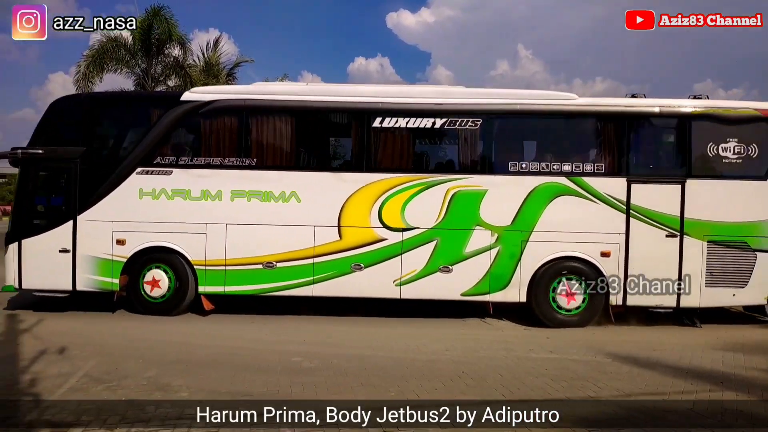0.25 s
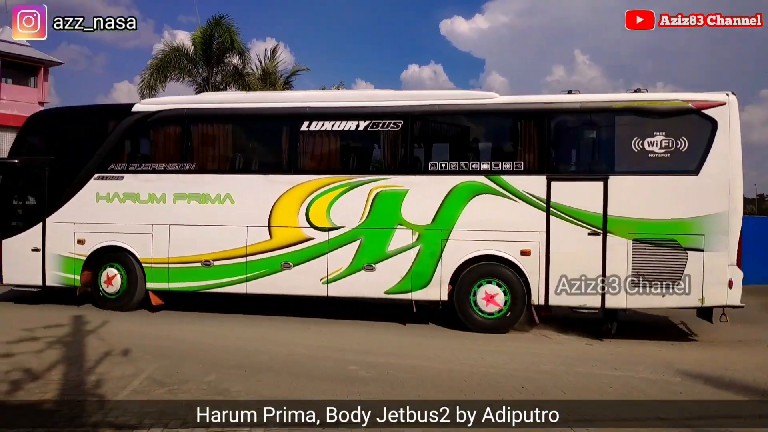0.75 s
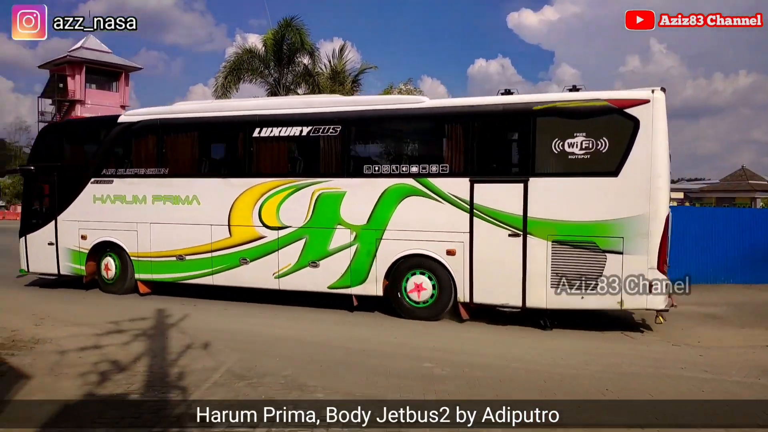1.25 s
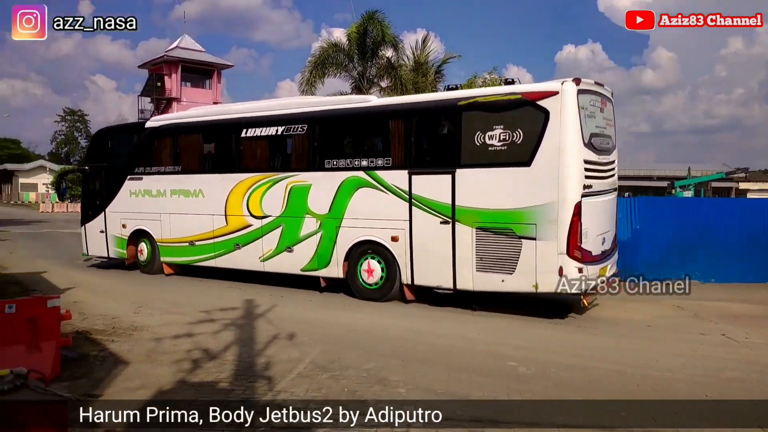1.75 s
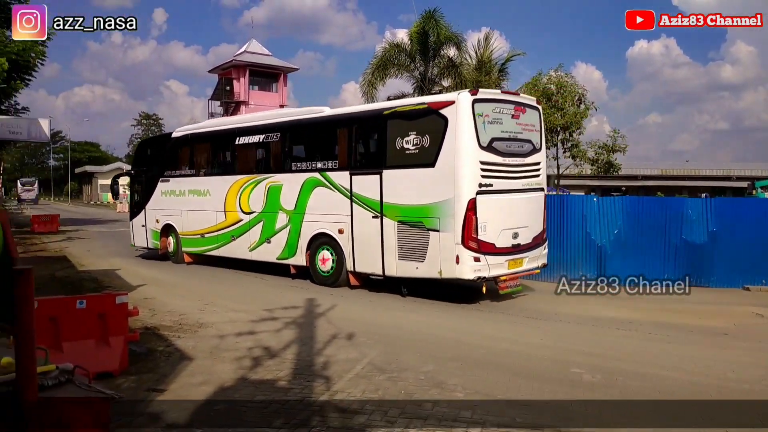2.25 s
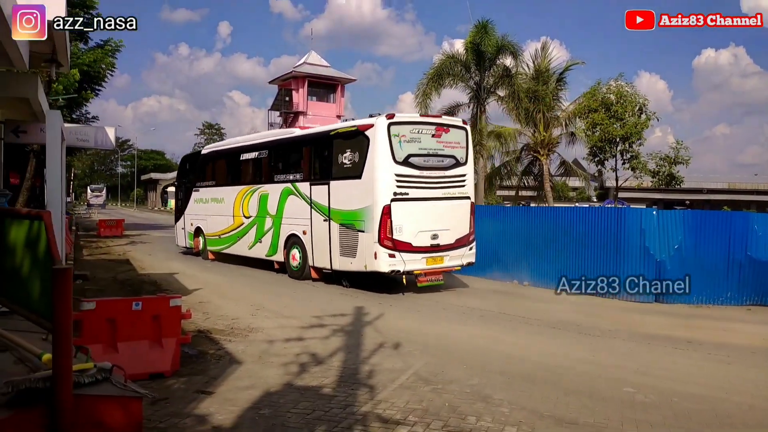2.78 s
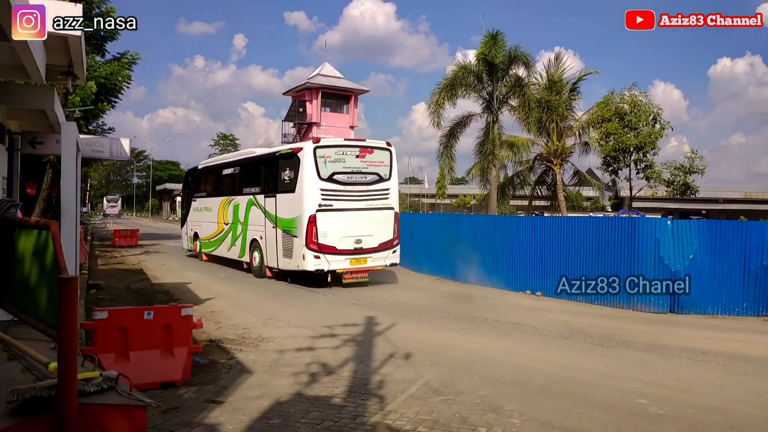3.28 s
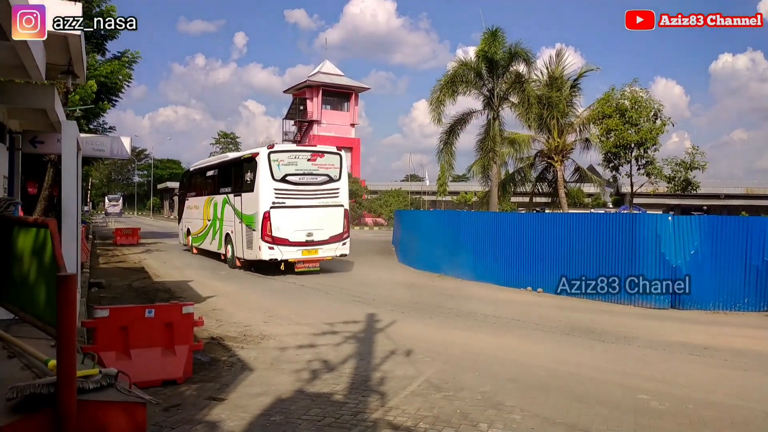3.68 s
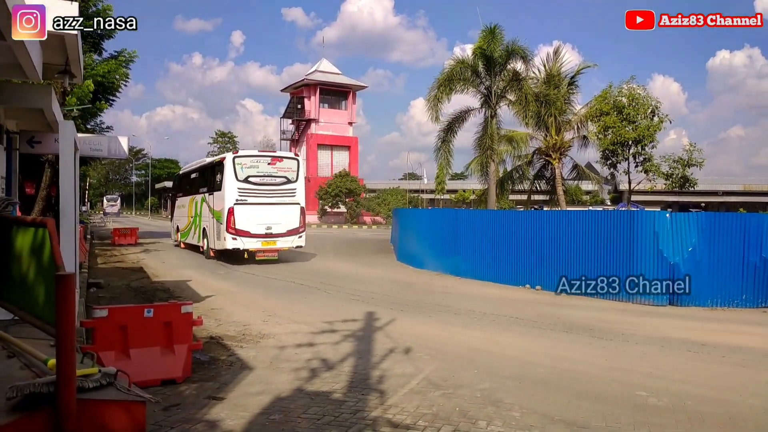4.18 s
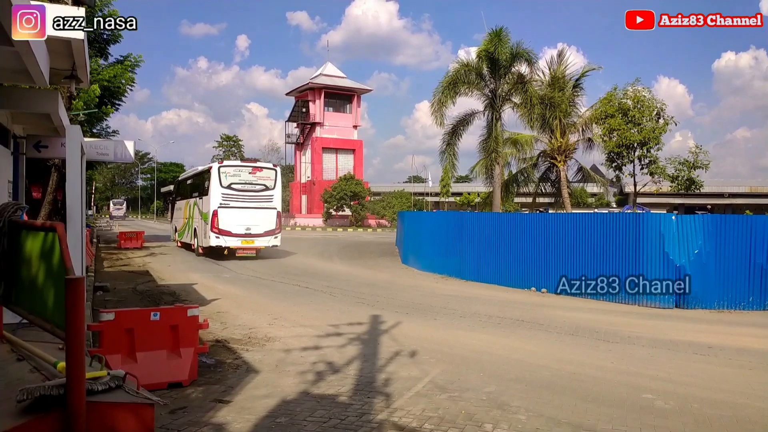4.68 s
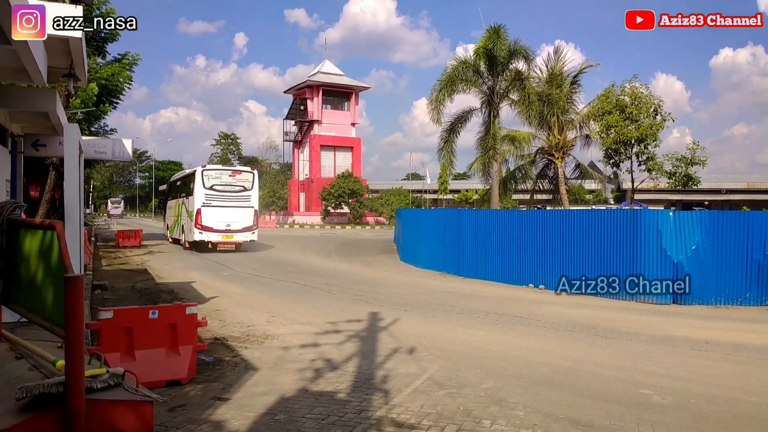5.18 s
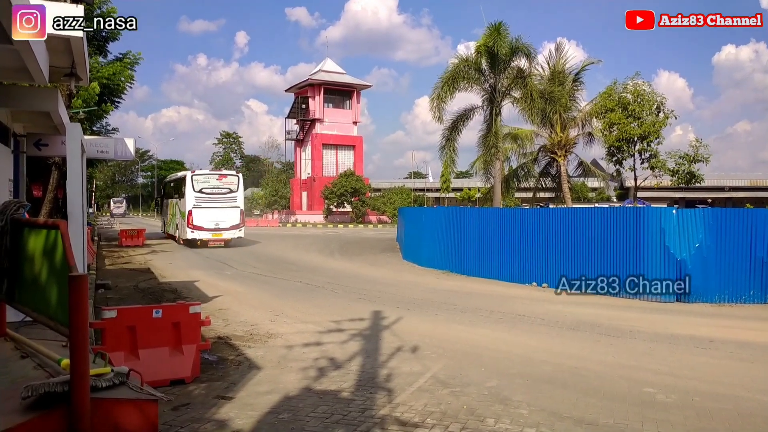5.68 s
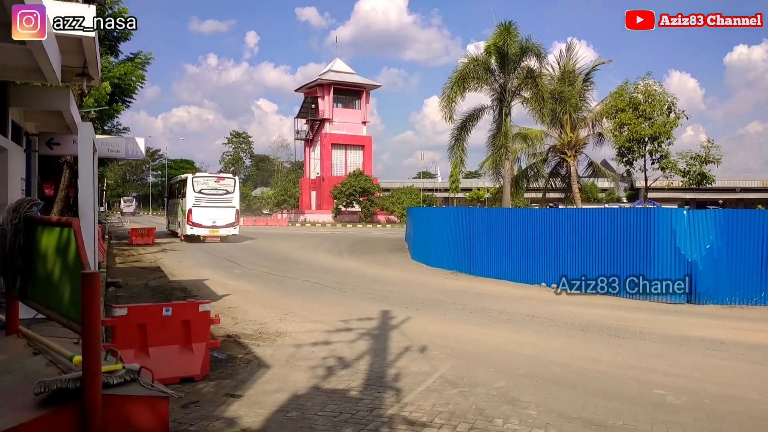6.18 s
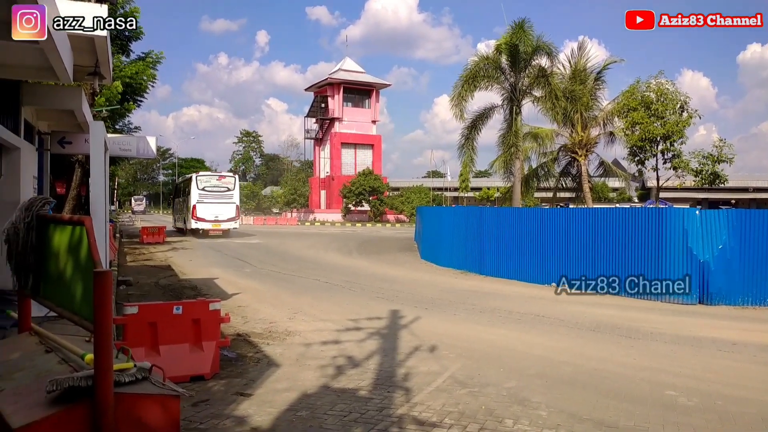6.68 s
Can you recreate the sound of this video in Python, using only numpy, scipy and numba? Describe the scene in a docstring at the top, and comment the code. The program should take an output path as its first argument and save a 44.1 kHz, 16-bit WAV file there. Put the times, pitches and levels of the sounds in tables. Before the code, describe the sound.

Outdoors at a bus terminal, a coach pulls away from a nearby phone microphone. Low, smooth diesel throb opens and climbs in pitch. As the rear engine bay turns towards the microphone, a broad roar with clatter and bright hiss swells, peaking just after three seconds. It fades quickly by five seconds, leaving traffic wash, low rumble and faint electrical hum. Mono, centred.

```python
"""Low, clean firing tones open the scene: a diesel coach pulls away past a phone at a bus terminal's kerb.
The tones are sines at multiples of a firing rate that climbs with the revs, then settles.
The rear engine bay turns to the phone: shaped-noise roar, clatter and hiss swell, combed by a short echo,
with singing bands and air puffs of band-passed noise. They fade into traffic wash, rumble and mains hum.
One microphone feeds both channels."""
import sys
import numpy as np
from scipy import signal
from scipy.fft import rfft, irfft, next_fast_len
from scipy.io import wavfile
from numba import njit

SR = 44100
rng = np.random.default_rng(int(sys.argv[2]) if len(sys.argv) > 2 else 0)


def wav_record(signal):
    """Record a signal, one row per channel, as 16-bit PCM in the file named by sys.argv[1]."""
    frames = np.transpose(np.atleast_2d(signal))
    bounded = np.clip(frames, -1, 1)
    # unit amplitude maps onto the largest positive 16-bit level
    quanta = np.round(bounded * 32767).astype(np.int16)
    wavfile.write(sys.argv[1], SR, quanta)


N = 306178  # samples, just under 7 s


def undb(db):
    """Turn decibels into an amplitude factor."""
    return 10 ** (np.asarray(db) / 20)


def unit(x):
    """Scale a sound to an RMS level of 1."""
    return x / np.sqrt(np.mean(x ** 2))


def curves(table):
    """Columns of a table, joined by straight lines in time."""
    seconds, *columns = np.transpose(table)
    return [np.interp(np.arange(N) / SR, seconds, column) for column in columns]


def walk(rate):
    """Random levels, rate a second, joined by straight lines; spread near 1."""
    levels = rng.standard_normal(256)
    # joining the levels narrows their spread; 1.2 restores it
    return 1.2 * np.interp(np.arange(N) * rate / SR, np.arange(len(levels)), levels)


def wash(points, shared_db, own_db, rate):
    """Noise with this spectrum, in half-octave slices that flicker together and alone."""
    hz, db = np.transpose(points)
    size = next_fast_len(N)
    octave = np.log2(np.arange(1, size // 2 + 2) * SR / size)
    shape = undb(np.interp(octave, np.log2(hz), db, -120, -120))
    noise = rfft(rng.standard_normal(size)) * shape
    last_slice = 2 * round(np.log2(hz[-1] / hz[1])) + 2
    out = 0
    for centre in np.log2(hz[1]) + np.arange(-1, last_slice) / 2:
        # triangular slices overlap so that together they add up to the whole spectrum
        window = np.clip(1 - 2 * np.abs(octave - centre), 0, 1)
        out = out + irfft(noise * window, size)[:N] * undb(own_db * walk(rate / 2))
    return unit(out * undb(shared_db * walk(rate)))


@njit
def svf(x, hz, width):
    """State-variable band-pass with a moving centre, gain 1 at the centre."""
    y, band, low = np.empty(len(x)), 0., 0.
    for i in range(len(x)):
        g, damping = np.tan(np.pi * hz[i] / SR), width / hz[i]
        v = (band + g * (x[i] - low)) / (1 + g * (g + damping))
        band, low, y[i] = 2 * v - band, low + 2 * g * v, damping * v
    return y


# Engine speed. Each row: time in seconds, firing rate in Hz.
ENGINE_SPEED = [(0, 41), (.23, 42), (.35, 46.3), (.67, 46.4), (.85, 47.8), (1.11, 47.8), (1.21, 54),
                (1.65, 53.2), (2.5, 62.5), (3.2, 70), (4.05, 75.9), (5.7, 76), (6.15, 72.8), (6.94, 74)]


def firing_phase():
    """Add up the firing rate into a phase, one turn per firing."""
    return 2 * np.pi * np.cumsum(curves(ENGINE_SPEED)[0]) / SR


# First three exhaust orders, which swell and fade as paths add and cancel; one list per order.
# Each row: time in seconds, level in dB.
ORDER_LEVELS = [
    [(0, -36), (.23, -31), (.35, -40), (.66, -34.5), (.84, -47), (.98, -36), (1.11, -36), (1.18, -48),
     (1.28, -42), (1.54, -48), (1.68, -39), (2.05, -35), (2.38, -37), (2.52, -34.5), (2.94, -46),
     (3.15, -62), (3.7, -47), (4.6, -45), (4.8, -60), (5.8, -64), (6.02, -47), (6.2, -57), (6.94, -56)],
    [(0, -45), (.05, -39), (.24, -39), (.56, -60), (.8, -43), (1.0, -63), (1.3, -61), (1.54, -44),
     (1.9, -62), (2.24, -40), (2.6, -40), (2.8, -52), (3.22, -39), (3.5, -43), (3.78, -49), (4.04, -34),
     (4.3, -45), (4.62, -35), (4.85, -49), (5.2, -41), (5.38, -52), (5.62, -36), (5.9, -56), (6.5, -48),
     (6.75, -63), (6.94, -62)],
    [(0, -63), (.84, -63), (1.26, -45), (1.68, -42), (1.82, -60), (1.96, -46), (2.1, -58), (3.08, -57),
     (3.22, -47), (3.4, -54), (3.64, -39), (3.8, -55), (4.2, -65), (4.4, -49), (5.25, -47), (5.8, -51),
     (6.1, -66), (6.94, -58)],
]


def exhaust(phase):
    """Firings heard as clean multiples of the firing rate, each wavering a little in level and phase."""
    out = 0
    for multiple, table in enumerate(ORDER_LEVELS, start=1):
        level = undb(curves(table)[0] + 1.06 * walk(14))
        waver = 0.13 * walk(6.3)  # radians
        out = out + np.sqrt(2) * level * np.sin(multiple * phase + waver)
    return out


# The engine bay's rise and fall. Each row: time in seconds, level in dB.
BAY_LEVEL = [(0, -40), (.3, -40), (.7, -39), (1.1, -37.5), (1.7, -31.5), (2.0, -28.5), (2.5, -22),
             (2.7, -19), (2.8, -20), (3.2, -14.5), (3.3, -16.5), (3.7, -17.5), (3.82, -20.5), (4.2, -24),
             (4.5, -28.5), (4.8, -35.5), (5.6, -34.5), (6.2, -42), (6.75, -37.5), (6.94, -37)]
# Balance of the bay's layers. Each row: time in seconds, then roar, clatter and hiss, in dB
# relative to the bay level.
BAY_BALANCE = [(0, -4.5, -5.5, -3), (1, -2.5, -4, 0), (2, -4.5, -3.5, -2), (2.65, -7, -7.5, -1.5),
               (3.2, -9, -5.5, -1.5), (3.6, -7.5, -5.5, -3), (4.1, -5, -3.5, -2.5), (4.8, -0.5, 1.5, 0),
               (5.3, -11.5, -11.5, -8.5), (6.2, -4, -4.5, -3), (6.94, -6.5, -8, -5)]
# Colour of the three layers. Each row: frequency in Hz, relative noise density in dB per Hz.
ROAR_SPECTRUM = [(150, -9), (200, -12.5), (300, -12), (400, -9), (520, -7), (680, -5.5), (840, -0.5),
                 (950, -1), (1020, -8), (1120, -15), (1300, -32)]
CLATTER_SPECTRUM = [(900, -13), (1100, -10), (1350, -4), (1600, -7), (2000, -2), (2500, -2.5), (3100, -4.5),
                    (4000, -6.5), (4700, -13), (5500, -27)]
HISS_SPECTRUM = [(2650, -39), (4500, -19.5), (4990, -11.5), (6890, -7), (8230, 0.5), (9520, -7.5),
                 (12400, -15.5), (14800, -17.5), (15600, -17)]
GRILLE_S, GRILLE_LASTS_S = 3.13, 0.99  # grille faces the phone; time either side to fall to 1/e
ECHO_MS, ECHO_TOP_HZ = 1.47, 7300
ECHO_AWAY, ECHO_FACING = .08, 0.17  # gain of the echo, grille turned away and facing
THROB_AWAY, THROB_FACING = 0.067, 0.16  # depth of the firing throb, likewise


def engine_bay(phase):
    """Roar, clatter and hiss, the last two puffed once a firing, reach the phone twice."""
    roar_db, clatter_db, hiss_db = curves(BAY_BALANCE)
    facing = np.exp(-((np.arange(N) / SR - GRILLE_S) / GRILLE_LASTS_S) ** 2)
    echo = ECHO_AWAY + (ECHO_FACING - ECHO_AWAY) * facing
    throb = THROB_AWAY + (THROB_FACING - THROB_AWAY) * facing
    puff = 1 + throb * np.cos(phase)
    clatter = undb(clatter_db) * wash(CLATTER_SPECTRUM, 0.31, 0.83, 9)
    hiss = undb(hiss_db) * wash(HISS_SPECTRUM, 0.54, 0.43, 18)
    # gusts and passing panels shake the treble as a whole
    bright = (clatter + hiss) * undb(0.85 * walk(15))
    roar = undb(roar_db) * wash(ROAR_SPECTRUM, 0.59, 0.6, 7.9)
    sound = roar + puff * bright
    # a second, duller path a little longer combs the spectrum
    late = np.roll(sound, int(ECHO_MS * SR / 1000))
    late = signal.sosfilt(signal.butter(2, ECHO_TOP_HZ, fs=SR, output="sos"), late)
    return undb(curves(BAY_LEVEL)[0]) * (walls(sound + echo * late) + rings())


# Bands that sing while a panel, duct or vent turns towards the phone.
# Each row: loudest moment in seconds, time either side to fall to 1/e in seconds, early centre in Hz,
# late centre in Hz, approximate width in Hz, level in dB relative to the bay level.
SINGING_BANDS = [(0.62, 0.53, 905, 940, 28, -11), (1.62, 0.39, 935, 950, 35, -9.5),
                 (2.34, 0.36, 950, 965, 30, -7), (3.55, 0.51, 965, 900, 65, -10.5),
                 (4.9, 0.88, 920, 870, 28, -10), (3.39, 0.37, 670, 690, 23, -14),
                 (5.21, 0.45, 636, 665, 19, -9.5), (3.21, 0.45, 765, 830, 22, -15),
                 (2.97, 0.3, 570, 720, 20, -24), (2.0, 0.53, 500, 467, 35, -13.5),
                 (3.47, 0.44, 455, 460, 27, -15.5), (4.65, .45, 450, 465, 33, -7),
                 (3.52, 0.65, 236, 244, 8, -25.5), (3.3, 0.56, 362, 338, 30, -25),
                 (0.43, 0.32, 350, 340, 15, -9), (.5, 0.44, 185, 190, 7.5, -11),
                 (4.98, 0.64, 1200, 1500, 70, -15), (2.08, 0.43, 1980, 2000, 104, -11.5),
                 (3.02, .3, 1990, 1930, 78, -12), (6.7, .6, 1780, 1800, 140, -9),
                 (3.07, 0.52, 2760, 2640, 174, -8), (4.53, 0.75, 2640, 2220, 180, -10.5),
                 (5.9, 0.64, 2370, 2210, 58, -14), (2.5, 0.53, 4100, 4280, 130, -18),
                 (3.74, 0.83, 4160, 3800, 250, -12), (6.3, 0.97, 3750, 3730, 130, -20),
                 (3.0, .4, 5950, 6000, 170, -18), (3.0, .5, 6550, 6600, 170, -16),
                 (3.1, .6, 8050, 8300, 420, -10), (3.1, .8, 14300, 11700, 6300, -18.5)]
# Short puffs of air. Each row: loudest moment in seconds, time either side to fall to 1/e in seconds,
# centre in Hz, approximate width in Hz, level in dB relative to the bay level.
AIR_PUFFS = [(.9, .13, 6500, 5000, -5), (2.69, .04, 13700, 4960, -17), (6.8, .13, 8000, 1200, -3)]


def rings():
    """Turbulence sings in each band, in surges, while it points this way; air puffs work alike."""
    t, out, air = np.arange(N) / SR, np.zeros(N), rng.standard_normal(N)
    steady_puffs = [(s, lasts, hz, hz, width, db) for s, lasts, hz, width, db in AIR_PUFFS]
    for s, lasts, early_hz, late_hz, width, db in SINGING_BANDS + steady_puffs:
        near = np.abs(t - s) < 2 * lasts
        hz = np.interp(t[near], [s - lasts, s + lasts], [early_hz, late_hz])
        # two wider passes in a row narrow down to about the stated width
        tone = svf(svf(air[near], hz, 1.5 * width), hz, 1.5 * width)
        surge = undb(db + 1.86 * walk(10)[near])
        swell = np.exp(-((t[near] - s) / lasts) ** 2)
        out[near] += unit(tone) * surge * swell
    return out


# Nearby kiosks and fences. Each row: average extra path in milliseconds, echo level in dB before dulling.
WALL_ECHOES = [(3.1, -11.5), (5.3, -15), (8.7, -13), (13.9, -13.5), (22.0, -12)]
WALL_DRIFT_MS, WALL_DRIFT_RATE = .25, 1.2  # spread of the path drift; new drift targets a second
WALL_TOP_HZ = 5100


def walls(x):
    """Echoes whose paths drift at random, so fine ripples wander through the spectrum."""
    at = np.arange(N)
    echoes, power = 0, 1
    for ms, db in WALL_ECHOES:
        lag = (ms + WALL_DRIFT_MS * walk(WALL_DRIFT_RATE)) * SR / 1000
        echoes = echoes + undb(db) * x[np.clip(at - lag.astype(int), 0, N - 1)]
        power += undb(2 * db)
    # rough walls dull the treble
    echoes = signal.sosfilt(signal.butter(1, WALL_TOP_HZ, fs=SR, output="sos"), echoes)
    return (x + echoes) / np.sqrt(power)


# The surroundings. Each row: time in seconds, then traffic, rumble and mains hum levels in dB.
SURROUNDINGS = [(0, -42, -42.5, -58), (1, -38, -43, -56), (2, -37, -40.5, -60), (3.4, -31.5, -42.5, -48),
                (4, -38.5, -46, -47), (5, -36, -47, -51), (6, -37.5, -47.5, -51.5),
                (6.94, -37.5, -47.5, -47)]
# Colour of traffic and tyre rumble. Each row: frequency in Hz, relative noise density in dB per Hz.
TRAFFIC_SPECTRUM = [(110, -9), (180, -4.5), (240, -3), (300, -14), (420, -4), (520, -5.5), (880, -3),
                    (1000, -16.5), (1120, -12.5), (1350, -5.5), (2300, -7), (3000, -19.5), (4500, -25.5),
                    (8400, -12.5), (12500, -28.5), (15600, -29)]
RUMBLE_SPECTRUM = [(18, -28), (28, -2), (45, -6), (70, -1), (110, -4.5), (190, -6.5), (250, -12.5),
                   (330, -9.5)]
HUM_HZ = 100


def terminal():
    """Distant traffic and tyre rumble as flickering noise, and the wiring's hum as a wavering sine."""
    traffic_db, rumble_db, hum_db = curves(SURROUNDINGS)
    hum_level = np.sqrt(2) * undb(hum_db + 1.5 * walk(3.3))
    hum = hum_level * np.sin(2 * np.pi * HUM_HZ * np.arange(N) / SR)
    traffic = undb(traffic_db) * walls(wash(TRAFFIC_SPECTRUM, 0.2, 1.0, 6))
    rumble = undb(rumble_db) * wash(RUMBLE_SPECTRUM, 0.35, .8, 4.05)
    return traffic + rumble + hum


def scene():
    """One microphone feeds both channels."""
    phase = firing_phase()
    mono = exhaust(phase) + engine_bay(phase) + terminal()
    return np.array([mono, mono])


TOP_HZ = 15540


def record(dry):
    """The phone rounds the loudest peaks and cuts the top steeply."""
    rounded = np.tanh(.8 * dry) / .8
    return signal.sosfilt(signal.ellip(14, .2, 100, TOP_HZ, fs=SR, output="sos"), rounded)


dry = scene()
out = record(dry)
wav_record(out)
```